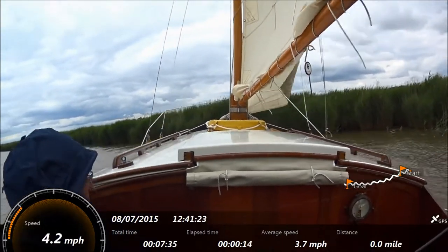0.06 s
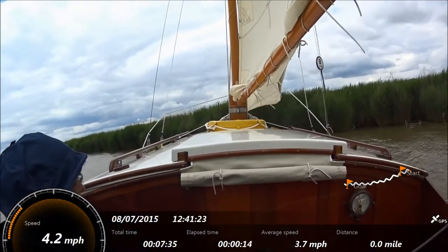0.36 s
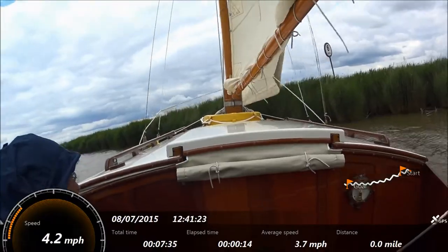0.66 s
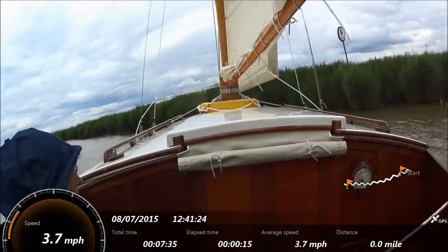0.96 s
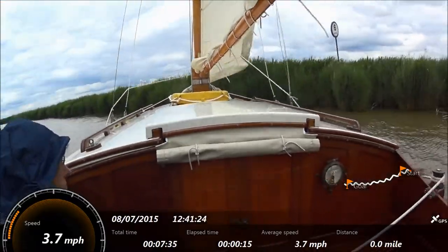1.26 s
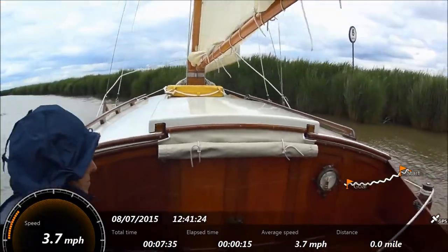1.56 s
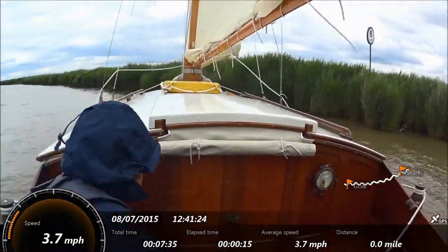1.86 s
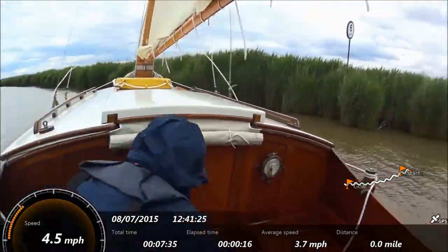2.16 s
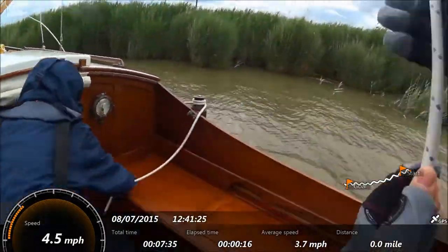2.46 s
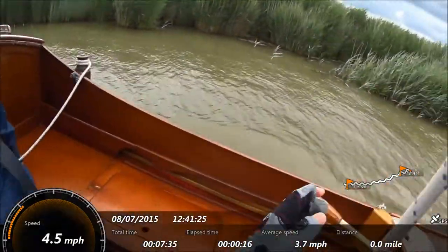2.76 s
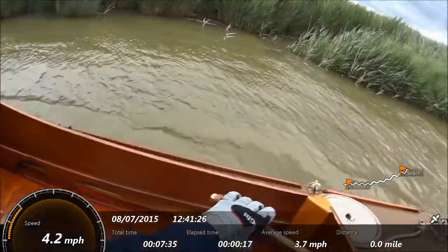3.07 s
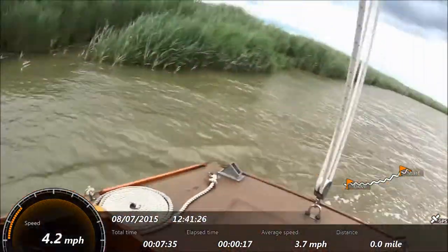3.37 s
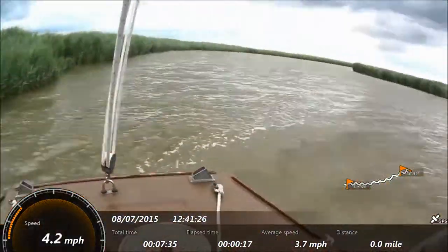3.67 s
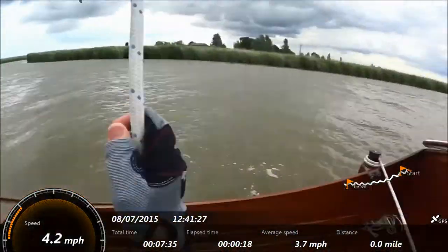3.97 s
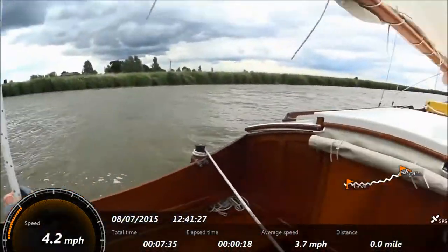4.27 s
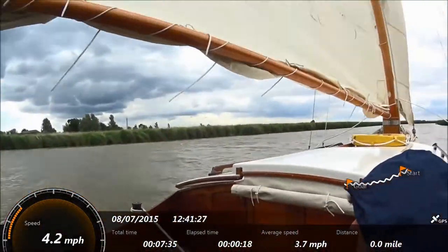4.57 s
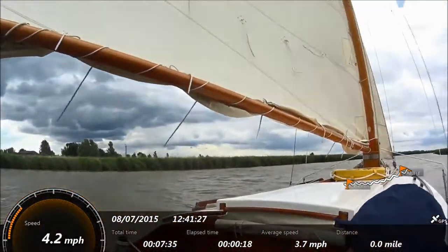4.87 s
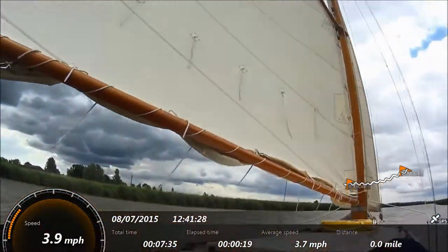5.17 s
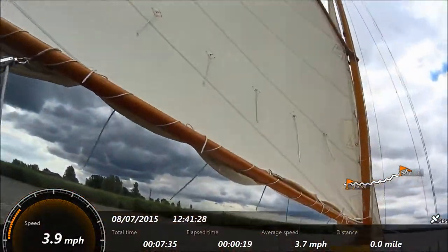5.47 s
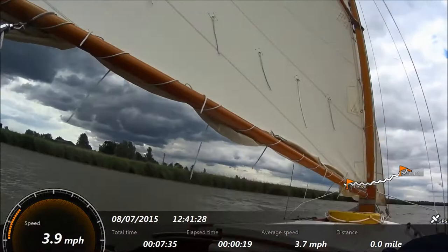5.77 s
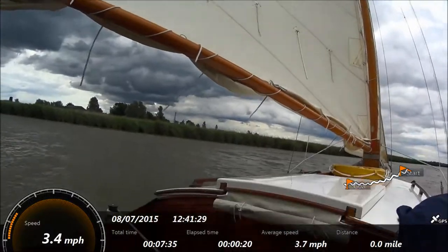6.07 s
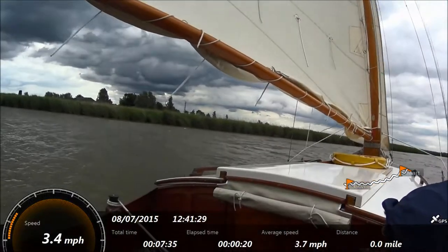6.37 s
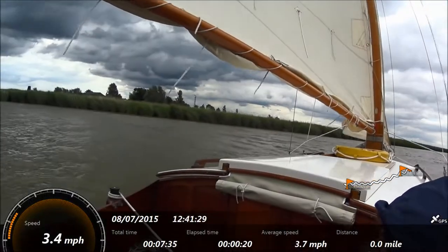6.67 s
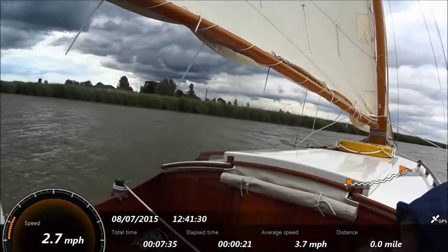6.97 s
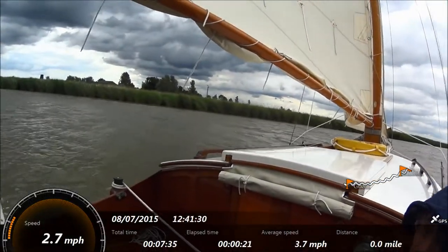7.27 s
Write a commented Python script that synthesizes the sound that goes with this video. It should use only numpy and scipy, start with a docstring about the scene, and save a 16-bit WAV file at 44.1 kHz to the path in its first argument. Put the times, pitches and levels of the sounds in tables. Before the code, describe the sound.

In the cockpit of a wooden sailing boat, water laps along the hull under a low wind rumble. Scattered knocks hit the woodwork, then a rope rubs and gives a brief squeal. From about three seconds a ratchet block clicks in quick metallic runs, thinning to single clicks near the end. A waterproof jacket swishes and the plastic case of the body-worn microphone creaks up close.

```python
"""A ratchet block clicks in runs as a sheet is hauled through it on a wooden sailing boat on a river.
Each impact of the steel pawl excites the damped modes of the block and the deck. Friction makes the
rope rub and squeal and jackets swish; the cockpit takes knocks. The plastic case of a body-worn camera
creaks by stick-slip as it turns, and its limiter holds the clicks down. Underneath, bubbles ring in
the water along the hull and a low wind rumbles."""
import sys
import numpy as np
from scipy import signal
from scipy.fft import rfft, irfft, next_fast_len
from scipy.io import wavfile
from scipy.ndimage import uniform_filter1d, map_coordinates

SR = 44100
rng = np.random.default_rng(int(sys.argv[2]) if len(sys.argv) > 2 else 0)


def materialize(psi):
    """Save the field psi as 16-bit PCM at rate SR to the path in sys.argv[1].

    A 1-D psi becomes a single channel; in a 2-D psi each row is a channel.
    """
    bounded = np.clip(np.atleast_2d(psi).T, -1, 1)
    quanta = np.round(bounded * 32767).astype(np.int16)
    wavfile.write(sys.argv[1], SR, quanta)


N = 327222
TIME = np.arange(N) / SR

# Impacts of the pawl. Each row: start in seconds, level in dB, ping frequency in Hz.
PAWL_CLICKS = [(3.1537, -24, 5190), (3.2243, -21, 5470), (3.254, -20.5, 5430), (3.2811, -20, 5080),
               (3.31, -21.5, 4970), (3.3937, -22, 5040), (3.442, -22.5, 4670), (3.469, -20, 4930),
               (3.492, -19.5, 4880), (3.511, -14.5, 4900), (3.5314, -23, 4910), (3.55, -22, 5000),
               (3.5728, -15.5, 4760), (3.6007, -18.5, 5230), (3.6297, -16, 5100), (3.6576, -18, 4450),
               (3.712, -18, 5360), (3.8182, -22, 4830), (3.9863, -24.5, 4550), (4.0306, -17.5, 4880),
               (4.0672, -17, 5080), (4.0946, -16, 5200), (4.1208, -15, 5270), (4.1503, -13, 4650),
               (4.1789, -14, 5160), (4.214, -8, 4780), (4.2572, -19, 4940), (4.357, -15.5, 4920),
               (4.5098, -12, 4980), (4.5436, -12, 4620), (4.5745, -15, 5260), (4.6096, -15.5, 4880),
               (4.7002, -14.5, 4580), (4.773, -15, 4840), (4.8243, -15, 5120), (4.9486, -18.5, 4790),
               (5.0978, -28.5, 4760), (5.1492, -10.5, 4850), (5.1815, -12, 4380), (5.217, -15.5, 5030),
               (5.2567, -18, 4730), (5.2916, -17.5, 4800), (5.3267, -16.5, 5140), (5.3556, -18, 5100),
               (5.3834, -14.5, 5230), (5.4178, -16.5, 5060), (5.8696, -17, 4580), (5.9559, -16, 4880),
               (6.0076, -18.5, 5270), (6.104, -12.5, 4850), (7.0684, -15.5, 4940), (7.2285, -16, 5000)]
# Modes of the block. Each row: frequency in Hz, level in dB, 60 dB decay time in seconds.
BLOCK_MODES = [(2005, -1.5, 0.082), (3280, -10, .04), (4190, 1.5, 0.042), (4470, -8, 0.068),
               (4710, -5, 0.028), (5030, -4, 0.091), (5850, -1, 0.046)]
# How far the listener faces the block at the stern. Each row: time in seconds, facing from 0 to 1.
FACING_BLOCK = [(3.15, 1), (3.55, 1), (3.65, 0.6), (3.85, .9), (4.2, 0.46), (4.35, 0.3), (4.55, 0.35),
                (4.9, 0.01), (7.4, 0.33)]
# How hard the sheet runs. Each row: time in seconds, rubbing level in dB.
HAUL_LEVEL = [(0, -43), (.9, -47), (1.3, -41.5), (1.7, -34), (1.86, -41.5), (2, -36), (2.42, -33.5),
              (2.8, -38.5), (3.12, -40), (3.3, -37), (3.65, -40.5), (3.85, -36), (4.25, -36), (4.45, -40),
              (5.3, -46), (6.4, -48), (6.76, -41.5), (7, -47)]
# A groan and a chirp of the rope, one list each. Each row: time in seconds, pitch in Hz, level in dB.
SQUEAL_CURVES = [
    [(2.22, 1394, -29), (2.245, 1540, -31), (2.275, 1530, -25), (2.3, 1586, -31), (2.315, 1521, -32),
     (2.335, 1560, -42), (2.35, 1634, -24), (2.375, 1710, -57)],
    [(2.375, 2704, -40), (2.395, 3000, -20), (2.412, 2980, -19.5), (2.425, 3550, -22), (2.44, 3870, -47)],
]
# Strokes of a sleeve. Each row: start in seconds, end in seconds, level in dB.
SLEEVE_STROKES = [(1.664, 1.888, -46), (1.885, 2.06, -33.5), (2.1, 2.153, -37), (2.382, 2.42, -27),
                  (2.687, 2.764, -40), (3.805, 3.994, -40), (4.0, 4.24, -48), (4.255, 4.337, -32),
                  (4.448, 4.625, -38), (4.753, 4.964, -35.5), (5.792, 5.998, -41.5), (6.557, 6.62, -42),
                  (6.614, 6.781, -33)]
# Blows in the cockpit. Each row: start in seconds, level in dB, cavity resonance in Hz,
# scrape level in dB relative to the blow, 60 dB decay time in seconds.
COCKPIT_KNOCKS = [(0.086, -27.5, 1244, -11, 0.26), (0.228, -15, 1234, -15, 0.05),
                  (0.39, -22, 1206, -14, 0.11), (0.432, -26, 1180, -13, 0.13),
                  (0.452, -24.5, 705, -11, 0.08), (0.669, -27.5, 1470, -12, 0.24),
                  (0.772, -25.5, 1493, -14.5, 0.12), (1.105, -26.5, 1394, -11, 0.19),
                  (1.197, -13.5, 1190, -9.5, 0.089), (1.237, -21, 648, 0.5, 0.081),
                  (1.303, -25, 1370, -6, 0.18), (1.347, -28, 1566, -6, 0.16), (1.67, -28.5, 1460, -9, 0.53),
                  (1.917, -29, 1510, -6, 0.2), (1.951, -25, 567, -20, 0.13), (1.968, -24.5, 1500, -8, 0.14),
                  (2.062, -23.5, 1504, -9.5, 0.12), (2.207, -25, 1257, -23, 0.15),
                  (2.246, -26.5, 1470, -4, 0.4), (2.3, -23, 1480, 7, 0.074), (2.343, -27, 1580, 6, 0.041),
                  (2.828, -17.5, 1440, -8.5, 0.11), (2.9, -23, 1553, -9, 0.12),
                  (3.375, -23, 1403, -22, 0.055), (3.656, -17, 1600, -11, 0.082),
                  (3.869, -17, 1230, -19, 0.13), (3.939, -16.5, 754, -10, 0.13),
                  (4.312, -28, 602, 0, 0.099), (5.685, -28.5, 633, -24, 0.076),
                  (5.725, -33, 1414, -25, 0.23), (6.28, -35, 546, -5, 0.24), (6.767, -24, 629, -8, 0.12),
                  (6.885, -31, 1490, -26, 0.18), (7.084, -21, 1660, -6, 0.055),
                  (7.325, -33, 1440, -0.5, 0.059)]
# Bouts of creaking. Each row: start in seconds, length in seconds (0 is one snap), slip level in dB.
CREAK_BOUTS = [(0.1603, 0.0011, -14), (0.4328, 0.0024, -9), (2.333, .065, -12.5), (2.4612, 0.08, -17.5),
               (2.58, 0.0061, -1), (2.595, 0.08, -9.5), (2.751, 0.022, -7.5), (2.8517, 0.12, -4.5),
               (3.0504, 0.011, -7.5), (5.005, 0.066, -18.5), (5.0676, 0, -8), (5.6338, 0.00069, -2),
               (5.7256, 0.015, -6.5), (5.948, 0.095, -15), (6.5957, 0.0069, -11.5), (6.806, 0.0034, -14),
               (6.878, 0.03, -23)]
# Stereo swing as the listener turns. Each row: time in seconds, left minus right level in dB.
LISTENER_TURN = [(0, -1), (1.2, -1.5), (1.8, -0.3), (2.3, -1), (2.8, 0.5), (3.7, -2), (4.3, -.3),
                 (4.8, 0.5), (5.3, 0.8), (5.8, 0), (6.7, 0.5), (7.4, 0.7)]

# Background envelopes. Each row: time in seconds, level in dB.
WASH_LEVEL = [(0, -37), (.2, -37), (.4, -37), (.66, -39.5), (.85, -45.5), (1.3, -41), (1.85, -39.5),
              (2, -36), (2.55, -35), (3.05, -35.5), (3.7, -32.5), (3.85, -28.5), (4.2, -36), (4.7, -42),
              (5.1, -38), (5.3, -48), (5.8, -38), (6.35, -49.5), (6.85, -36.5), (7.05, -48.5),
              (7.42, -46.5)]
WIND_LEVEL = [(0, -52), (.5, -55), (1.2, -59), (1.85, -50.5), (2.5, -55), (2.8, -50), (3.2, -53.5),
              (3.97, -46), (4.13, -64), (4.32, -46), (4.6, -54), (5.05, -53), (5.3, -61.5), (6.05, -55),
              (7.42, -59)]
HULL_BOOM_LEVEL = [(0, -42), (.6, -45.5), (.85, -50), (1.15, -48.5), (2.3, -47.5), (2.48, -53),
                   (2.8, -45.5), (3.22, -43.5), (3.4, -34.5), (3.58, -51.5), (3.92, -41), (4.1, -47.5),
                   (5.02, -47), (5.3, -57), (5.8, -49), (6.55, -52.5), (6.77, -43), (6.9, -54)]

# Spectral shapes of the sources. Each row: frequency in Hz, relative spectral density in dB.
SHEAVE_SPECTRUM = [(900, -43.5), (1500, -4), (2000, 0.5), (2800, -10), (3400, -0.5), (4400, -6),
                   (4900, 6.5), (5500, -3), (6000, -3.5), (7000, -13), (10000, -17)]
STEEL_SPECTRUM = [(4000, -4), (6500, 5), (7600, 1), (8300, 9.5), (8750, 11), (9300, -9.5), (10200, 9),
                  (11000, -27)]
DECK_SPECTRUM = [(200, -42), (390, -39), (510, 4.5), (900, 3), (1350, 3.5), (1800, -1.5), (2800, -3.5),
                 (5000, -14)]
ROPE_SPECTRUM = [(700, -29), (1500, -3.5), (2200, -5.5), (3000, 0.5), (3800, -0.5), (4700, 6), (5400, 1.5),
                 (6100, 0.5), (7200, -9), (8600, -11), (9400, -13), (10100, -4.5), (11000, -12)]
CHAFE_SPECTRUM = [(900, -28), (1500, 2.5), (2100, 3.5), (2900, -2), (3600, -13), (5000, -10), (8000, -47)]
CLOTH_SPECTRUM = [(3000, -40), (6000, 6.5), (6700, 3.5), (7200, 8.5), (7800, 1.5), (8700, 1.5), (9400, 1.5),
                  (10100, 9), (11000, 5)]
WOOD_SPECTRUM = [(150, -36), (370, -15.5), (540, -1), (900, -2.5), (1400, 4), (1800, -1.5), (2200, -1.5),
                 (3000, -8.5), (6000, -37)]
SCRAPE_SPECTRUM = [(1200, -27), (2300, 0.5), (3400, 12.5), (4800, 12.5), (6200, 2.5), (7500, -6.5),
                   (11000, -6)]
CASE_SPECTRUM = [(250, -30), (600, -19), (1300, -6.5), (1800, -3), (2200, 4), (2500, -3), (3100, -12),
                 (4000, -42), (9000, -35)]
WATER_SPECTRUM = [(150, -15), (330, -15.5), (520, -1), (720, -1), (950, -4.5), (1220, 0.5), (1450, 3),
                  (1750, -9.5), (2150, 0.5), (2900, -16), (5000, -24.5), (10000, -38)]
WIND_SPECTRUM = [(12, -2), (25, -2.5), (45, -2.5), (80, -2), (130, -24), (400, -32.5)]
HULL_SPECTRUM = [(50, -16), (100, 3), (170, 3), (230, -1), (320, -10), (500, -8.5), (1000, -56.5)]


def ratchet():
    """Impact excitation: the pawl drops off a tooth, steel ticks, the block clacks, the deck answers."""
    s, db, ping_hz = np.transpose(PAWL_CLICKS)
    facing = np.interp(s, *np.transpose(FACING_BLOCK))
    tick_db = db - 21.5 + 14 * facing
    thud_db = db - 16 + 17.5 * facing
    snap = bursts(s - 0.0003, db + 2, t60_s=0.0185, attack_s=0.00089)
    clack_tail = bursts(s + 0.0018, db - 8.5, t60_s=0.074, attack_s=0.00029)
    clack = coloured(hiss(side_db=-12) * (snap + clack_tail), SHEAVE_SPECTRUM)
    crack = bursts(s - 0.0005, tick_db + 6, t60_s=0.00888, attack_s=0.00018)
    tick_tail = bursts(s, tick_db - 7, t60_s=0.1184, attack_s=0.00065)
    tick = coloured(hiss(side_db=-2.5) * (crack + tick_tail), STEEL_SPECTRUM)
    deck_envelope = bursts(s + 0.00037, thud_db, t60_s=0.1073, attack_s=0.0012)
    thud = coloured(hiss(side_db=-10.5) * deck_envelope, DECK_SPECTRUM)
    return pawl_ring(s, db - 2.5 + facing, ping_hz, tick_db) + clack + tick + thud


def pawl_ring(s, db, ping_hz, tick_db):
    """Free vibration: block, tooth and pawl spring ring, and the loaded rope damps them quickly."""
    hz, mode_db, t60 = np.transpose(BLOCK_MODES)[:, :, None]
    ring, t = np.zeros((2, N)), np.arange(SR // 8) / SR
    rope_damping = 0.55 + 0.75 * np.exp(-t / 0.005)
    draws = rng.standard_normal((len(s), 4, len(BLOCK_MODES), 1))
    for start, ring_db, ping, spring_db, draw in zip(s, db, ping_hz, tick_db, draws):
        size, detune, onset_phase, ear_phase = draw
        strength = amp(mode_db - 2.5 + 2 * size - 60 * t / t60)
        phase = 2 * np.pi * (hz * (1 + 0.012 * detune) * t + onset_phase)
        modes = np.array([np.sum(strength * np.sin(phase + ear * 0.39 * ear_phase), 0)
                          for ear in (-1, 1)])
        tooth = amp(2.5 - 60 * t / 0.054) * np.sin(2 * np.pi * ping * t)
        spring = amp(spring_db + 4 - 60 * t / 0.017) * fuzzy_tone(np.full(len(t), 8720), width_hz=160)
        block = (1 - np.exp(-t / 0.0013)) * amp(ring_db) * (modes + tooth)
        add(ring, start, rope_damping * (block + spring))
    return signal.sosfilt(signal.butter(4, 1300, "high", fs=SR, output="sos"), ring)


def rope_rubbing():
    """Sliding friction: fibres catch and slip, and a harder pull chafes lower and coarser."""
    rope_db = curve(HAUL_LEVEL)
    fibres = hiss(side_db=-6.5) * grain(depth_db=1.4, rate=490)
    catches = hiss(side_db=-6) * grain(depth_db=3.6, rate=160)
    chafe_db = rope_db - 2.5 + 0.51 * (rope_db + 39) + 1.3 * wobble(25.13)
    rub = amp(rope_db - 0.5 + 1.3 * wobble(35)) * coloured(fibres, ROPE_SPECTRUM)
    return rub + amp(chafe_db) * coloured(catches, CHAFE_SPECTRUM)


def rope_squeal():
    """Frictional oscillation: a rope slipping under load groans, then chirps, with a weak octave."""
    squeal = np.zeros(N)
    for rows in SQUEAL_CURVES:
        s, hz, db = np.transpose(rows)
        t = np.arange(s[0], s[-1], 1 / SR)
        pitch = np.interp(t, s, hz)
        core = np.sin(2 * np.pi * (np.cumsum(pitch) / SR + rng.random()))
        fundamental = 0.2 * core + 0.9 * fuzzy_tone(pitch, width_hz=0.25 * hz[0])
        octave = amp(-11) * fuzzy_tone(2 * pitch, width_hz=1900)
        add(squeal, s[0], amp(np.interp(t, s, db)) * (fundamental + octave))
    return squeal


def jacket_swish(edge_s=0.032):
    """Friction noise: waterproof cloth swishes for as long as an arm moves."""
    strokes = sum(amp(db) * (np.tanh((TIME - start) / edge_s) - np.tanh((TIME - end) / edge_s)) / 2
                  for start, end, db in SLEEVE_STROKES)
    weave = hiss(side_db=-2) * grain(depth_db=2, rate=500)
    return strokes * amp(2.2 * wobble(40)) * coloured(weave, CLOTH_SPECTRUM)


def cockpit_knocks():
    """Impact and cavity resonance: feet and gear thud, scrape and ring hollows in the woodwork."""
    s, db, hollow_hz, scrape_db, decay_s = np.vstack([COCKPIT_KNOCKS, gear_bumps(count=24)]).T
    hollow, contact, t = np.zeros(N), np.zeros(N), np.arange(SR // 6) / SR
    for start, blow_db, hz, t60 in zip(s, db, hollow_hz, decay_s):
        envelope = amp(blow_db - 4.5 - 60 * t / t60) * (1 - np.exp(-t / 0.00057))
        add(hollow, start, envelope * fuzzy_tone(np.full(len(t), hz), width_hz=160))
        hardness = min(0.082 / t60, 1.6)  # short blows land harder
        add(contact, start + 0.00105, amp([blow_db + 12]) * hardness)
    grit = grain(depth_db=2.9, rate=400)
    thud = hiss(side_db=-8) * grit * bursts(s, db, decay_s, attack_s=0.0056)
    scrape = hiss(side_db=-16) * grit * bursts(s, db + scrape_db, decay_s * 1.02, attack_s=0.00083)
    return hollow + coloured(contact + thud, WOOD_SPECTRUM) + coloured(scrape, SCRAPE_SPECTRUM)


def gear_bumps(count, hollow_hz=1420, scrape_db=-6.5, t60_s=0.15):
    """Random impacts of loose gear, stronger when the wash is louder; rows as in COCKPIT_KNOCKS."""
    s = (np.arange(count) + rng.random(count)) * TIME[-1] / count
    scatter_db, detune = rng.standard_normal((2, count))
    db = np.interp(s, *np.transpose(WASH_LEVEL)) + 6.5 + scatter_db
    hz = hollow_hz * np.exp(0.12 * detune)
    return np.column_stack([s, db, hz, np.full(count, scrape_db), np.full(count, t60_s)])


def case_creak():
    """Stick-slip: the case snaps and drags; flexing drives its two sound ports in opposite senses."""
    s, db = slip_train().T
    snaps = np.zeros(N)
    for start, slip_db in zip(s, db):
        add(snaps, start, amp([slip_db]))
    slips = bursts(s - 0.002, db - 3, t60_s=0.018, attack_s=0.00041)
    dragging = bursts(s - 0.004, db - 9, t60_s=0.029, attack_s=0.002)
    flexing = rng.standard_normal((2, N)) * np.hypot(slips, dragging)
    flexing[1] += amp(3) * snaps  # the snaps enter the side signal only
    return coloured(spread(amp(-11.5) * flexing, side_db=6.5), CASE_SPECTRUM)


def slip_train(count=40, gap_s=0.007, jitter=0.35, scatter_db=3):
    """Relaxation oscillation: the case lets go unevenly. Each row: start in seconds, level in dB."""
    rows = []
    draws = rng.standard_normal((len(CREAK_BOUTS), 2, count))
    for (start, length, db), (stretch, size) in zip(CREAK_BOUTS, draws):
        gaps = gap_s * np.exp(jitter * stretch)
        delay = np.cumsum(gaps) - gaps
        rows.append(np.column_stack([start + delay, db + scatter_db * size])[delay <= length])
    return np.concatenate(rows)


def water_wash():
    """Flow noise: water laps along the hull in a rush mixed with ringing bubbles."""
    gurgle = spread([bubbles(), bubbles()], side_db=-30)
    rush = amp(-4.5) * coloured(hiss(side_db=-2.5), WATER_SPECTRUM)
    bubbling = amp(-5.5) * unit(coloured(gurgle, WATER_SPECTRUM))
    return amp(curve(WASH_LEVEL) + wobble(30)) * (rush + bubbling)


def bubbles(count=3500, pitch_hz=1189, scatter=0.566, cycles=8.7):
    """Bubble resonance: short damped tones of random pitch and strength glide up as they die."""
    start, rank = rng.random((2, count, 1))
    hz = np.clip(pitch_hz * np.exp(scatter * rng.standard_normal((count, 1))), 300, 6000)
    n = np.arange(600)
    age = hz * n / SR / cycles
    strength = amp(-3.5 * np.log(rank + 0.025))  # many weak, few strong
    tones = strength * age * np.exp(-3 * age) * np.sin(2 * np.pi * cycles * age * (1 + 0.062 * age))
    positions = (start * N).astype(int) + n
    return unit(np.bincount(positions.ravel(), tones.ravel(), N + len(n))[:N])


def wind(gust_db=1.5, gusts_per_s=7):
    """Turbulent pressure: gusts buffet the camera with a low rumble."""
    level_db = curve(WIND_LEVEL) + 1.5 + gust_db * wobble(gusts_per_s)
    return amp(level_db) * coloured(hiss(side_db=-37), WIND_SPECTRUM)


def hull_boom():
    """Forced vibration: ripples make the hull boom."""
    level_db = curve(HULL_BOOM_LEVEL) - 2 + 2.5 * wobble(14)
    return amp(level_db) * coloured(hiss(side_db=-17), HULL_SPECTRUM)


def amp(db):
    """Decibels to amplitude ratio."""
    return 10 ** (np.asarray(db) / 20)


def unit(x):
    """Normalisation to rms 1."""
    return x / np.sqrt(np.mean(x ** 2) + 1e-20)


def curve(rows):
    """Linear interpolation of a table of times and values at every sample."""
    return np.interp(TIME, *np.transpose(rows))


def wobble(rate):
    """Smooth random modulation through rate knots a second."""
    return map_coordinates(rng.standard_normal(4096), [TIME * rate], mode="wrap")


def grain(depth_db, rate):
    """Roughness by amplitude modulation: a fast random gain of rms 1."""
    return unit(amp(depth_db * wobble(rate)))


def add(track, s, sound):
    """Superposition of a sound on a track at s seconds."""
    part = track[..., max(round(s * SR), 0):][..., :sound.shape[-1]]
    part += sound[..., :part.shape[-1]]


def coloured(x, spectrum, size=8192):
    """Minimum-phase filtering by a response of unit energy and the given spectral shape."""
    hz, db = np.transpose(spectrum)
    gain = amp(np.interp(np.log(np.fft.rfftfreq(size, 1 / SR) + 1), np.log(hz), db))
    cepstrum = irfft(np.log(gain))
    cepstrum[1:size // 2] *= 2
    cepstrum[size // 2 + 1:] = 0
    response = irfft(np.exp(rfft(cepstrum)))
    return signal.oaconvolve(x, response[None] / np.linalg.norm(response), axes=1)[:, :N]


def spread(pair, side_db):
    """Mid-side stereo: the sum and difference of two unrelated signals."""
    mid, side = pair[0], amp(side_db) * pair[1]
    return np.array([mid + side, mid - side])


def hiss(side_db):
    """White noise, partly correlated between the ears."""
    return spread(rng.standard_normal((2, N)), side_db)


def bursts(times, levels_db, t60_s, attack_s):
    """Envelope of blows that rise quickly, decay exponentially and add in power."""
    power, t = np.zeros(N), np.arange(SR // 4) / SR
    for s, db, t60 in np.broadcast(times, levels_db, t60_s):
        add(power, s, (amp(db - 60 * t / t60) * (1 - np.exp(-t / attack_s))) ** 2)
    return np.sqrt(power)


def fuzzy_tone(hz, width_hz):
    """Quadrature modulation: narrow-band noise around a pitch given for each sample."""
    t = np.arange(len(hz)) / SR
    a, b = (map_coordinates(knots, [t * width_hz], mode="wrap")
            for knots in rng.standard_normal((2, 256)))
    phase = 2 * np.pi * np.cumsum(hz) / SR
    return a * np.sin(phase) + b * np.cos(phase)


def scene():
    """Superposition in the cockpit; a level difference swings the boat's sounds as the listener turns."""
    boat = water_wash() + cockpit_knocks() + ratchet() + rope_rubbing()
    boat += spread([rope_squeal(), rope_squeal()], side_db=-13)
    turn_db = curve(LISTENER_TURN)
    boat *= amp([turn_db / 2, -turn_db / 2])
    rumble = (wind() + hull_boom()) * amp([[-0.7], [0.7]])  # slightly to the right
    return boat + rumble + jacket_swish() + case_creak()


def limiter(x, threshold_db, release_s, ratio):
    """Dynamic compression: the gain falls when the level passes the threshold, then recovers."""
    level = np.sqrt(np.abs(uniform_filter1d(np.mean(x, 0) ** 2, size=130)) + 1e-12)
    cut_db = np.maximum(20 * np.log10(level) - threshold_db, 0) * (1 - 1 / ratio)
    fade = TIME / release_s
    held_db = np.maximum.accumulate(cut_db * np.exp(fade)) * np.exp(-fade)
    return x * amp(-uniform_filter1d(held_db, size=70))


def record(dry):
    """Peak and band limiting: the camera holds the clicks down and cuts the highest treble."""
    held = limiter(dry, threshold_db=-24.5, release_s=0.027, ratio=3)
    size, cutoff_hz = next_fast_len(N + 8192), 11080
    hz = np.fft.rfftfreq(size, 1 / SR)
    low_pass = amp(-np.clip((hz - cutoff_hz) / 16, 0, 100))
    return irfft(rfft(held, size) * low_pass, size)[:, :N]


dry = scene()
out = record(dry)
materialize(out)
```